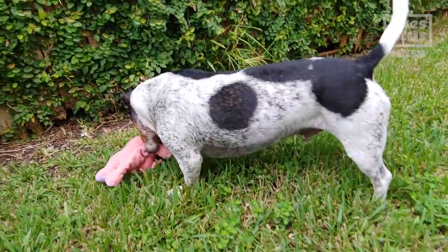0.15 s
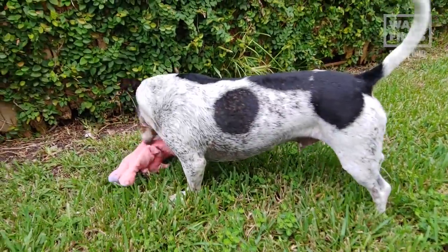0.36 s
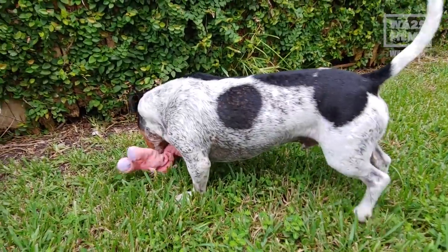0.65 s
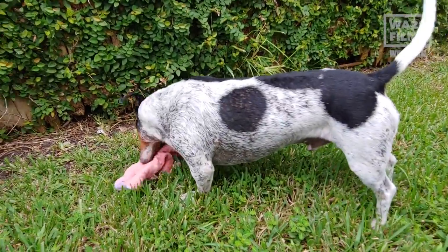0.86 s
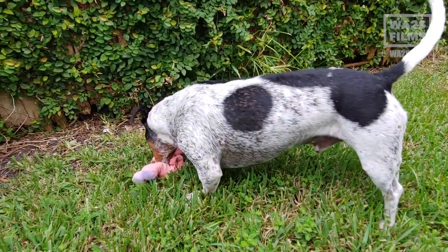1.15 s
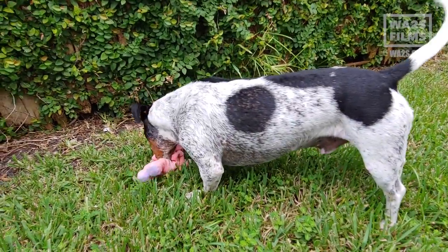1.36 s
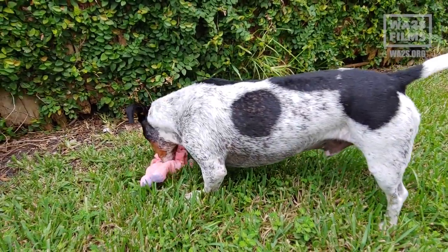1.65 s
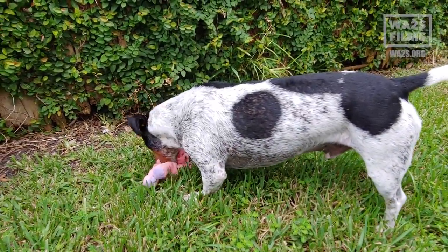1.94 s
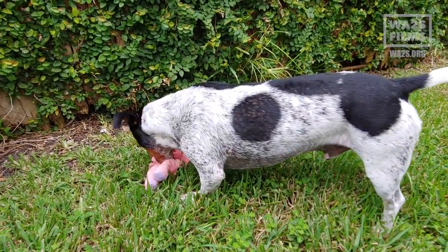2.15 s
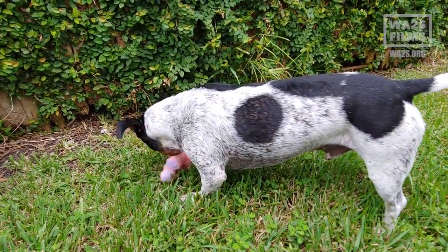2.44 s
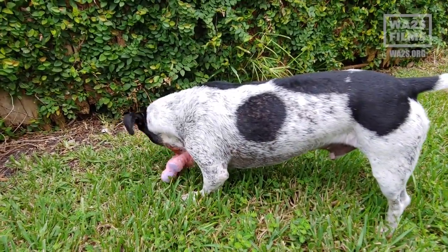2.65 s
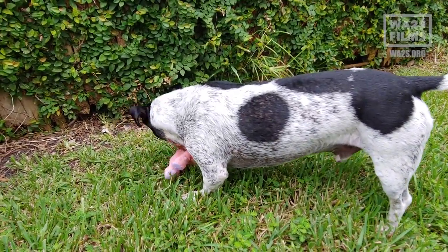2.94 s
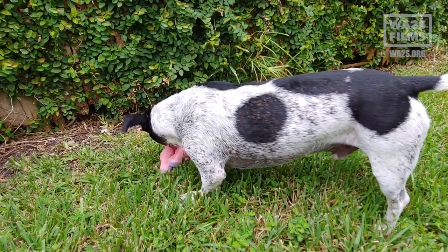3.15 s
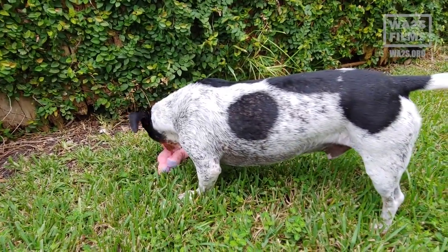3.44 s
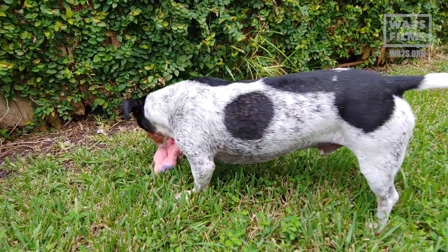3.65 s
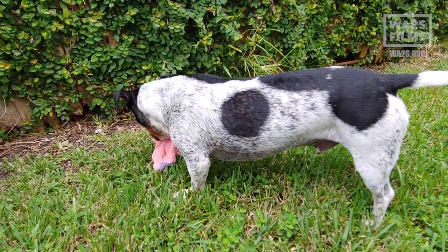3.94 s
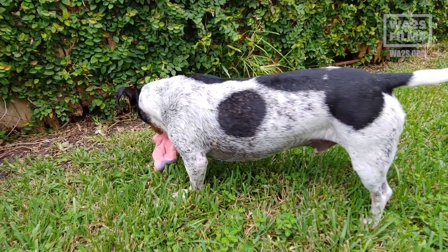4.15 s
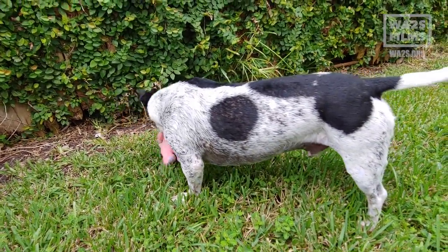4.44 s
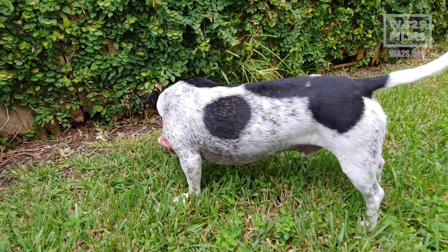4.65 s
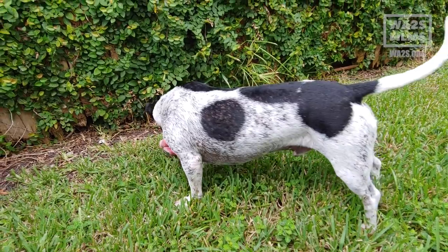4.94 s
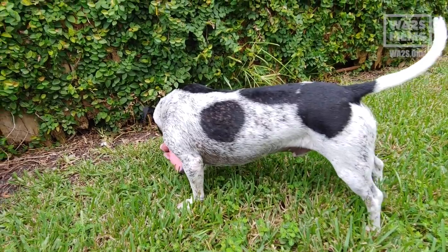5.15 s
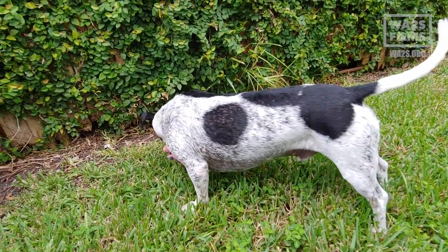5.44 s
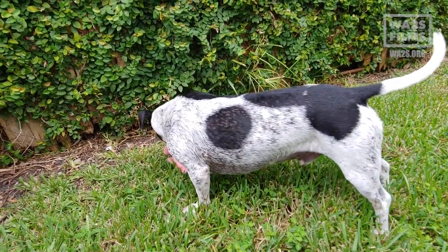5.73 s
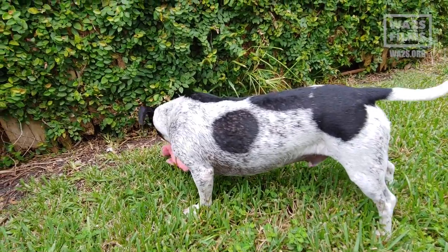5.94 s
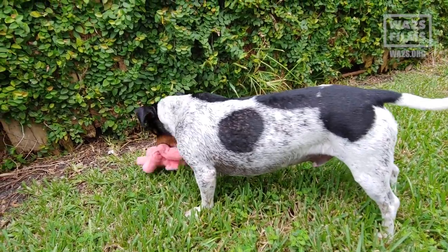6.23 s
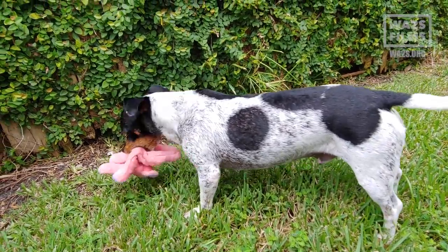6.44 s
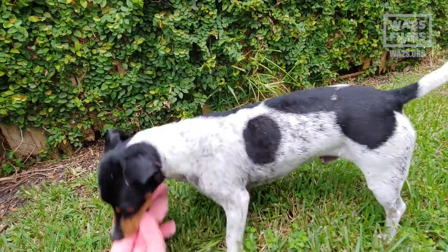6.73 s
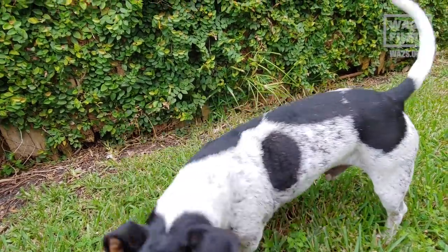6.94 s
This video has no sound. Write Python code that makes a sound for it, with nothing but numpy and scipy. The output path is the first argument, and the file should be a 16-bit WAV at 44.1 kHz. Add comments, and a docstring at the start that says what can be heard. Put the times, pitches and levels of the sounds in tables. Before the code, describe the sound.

Open yard with low steady hum, faint hiss and wind thumping independently on left and right microphone ports. Close in front, a dog works a soft toy: dry crackles and cloth rustle, quick creaking clicks, a single tiny downward squeak near one second, sparse ticks, then popping wet smacks in the second half. It ends with a brushing rustle and a short wet nasal puff. Only a faint short echo from leaves and ground.

```python
"""A dog chewing a squeaky toy

A dog chews a soft toy on a lawn, two metres from a pair of microphone ports. Short dull clicks creak before a
reed's one falling squeak, and go on as low ticks. Wet seals break in rising smacks, given body and edge by
short damped rings. Shaped noise makes the crackle and rustle of grass and cloth, the spit of the smacks and a
closing snort. Behind are the steady tones of a machine, the hiss of the yard and wind that buffets each port on
its own."""
import sys
import numpy as np
from scipy import signal
from scipy.fft import rfft, irfft, next_fast_len
from scipy.io import wavfile
from scipy.ndimage import uniform_filter1d, map_coordinates

SR = 44100
rng = np.random.default_rng(int(sys.argv[2]) if len(sys.argv) > 2 else 0)


def to_wav(s):
    """Save 16-bit WAV."""
    ch = np.atleast_2d(s).T  # columns
    pcm = np.round(np.clip(ch, -1, 1) * 32767)  # PCM
    wavfile.write(sys.argv[1], SR, pcm.astype(np.int16))


N = 313110
TIME_S = np.arange(N) / SR
FRAMES_S = np.arange(0, N / SR + .01, .002)  # coarse clock for slow changes


def gain_of(db):
    """Turns decibels into a gain."""
    return 10 ** (np.asarray(db) / 20)


def evened(x):
    """Scales a signal to rms 1."""
    return x / np.sqrt(np.mean(x ** 2) + 1e-20)


def bandpass(x, low_hz, high_hz, order=2):
    """Keeps the sound between two pitches."""
    return signal.lfilter(*signal.butter(order, [low_hz, high_hz], "band", fs=SR), x)


def read(points, hz):
    """Reads a curve of (pitch, value) points on a log pitch axis."""
    point_hz, value = np.transpose(points)
    return np.interp(np.log(hz + 1), np.log(point_hz + 1), value)


def curve(rows):
    """Draws every column of a timed table sample by sample."""
    start_s, *columns = np.transpose(rows)
    return [np.interp(TIME_S, start_s, column) for column in columns]


def colour(x, points):
    """Filters a sound through a spectrum given in dB."""
    size = next_fast_len(x.shape[-1])
    gain = gain_of(read(points, np.fft.rfftfreq(size, 1 / SR)))
    return irfft(rfft(x, size) * gain, size)[..., :x.shape[-1]]


def drift(per_s):
    """Wanders smoothly between random values, at most 60 a second, with rms 1."""
    knots = rng.standard_normal(480)
    slow = map_coordinates(knots, [FRAMES_S * min(per_s, 60)], order=3)
    return evened(np.interp(TIME_S, FRAMES_S, slow))


def pan_gains(pan_db):
    """Gains of the left and right port for a left-right difference in dB."""
    return gain_of([[pan_db / 2], [-pan_db / 2]])


def ports(x, pan_db, left_lag_ms):
    """Sends one sound to both ports, with a difference in level and arrival time."""
    size = next_fast_len(len(x))
    khz = np.fft.rfftfreq(size, 1e3 / SR)
    delay = np.exp(-1j * np.pi * khz * left_lag_ms)  # half the lag on each side
    pair = irfft(rfft(x, size) * np.array([delay, 1 / delay]), size)[:, :len(x)]
    return pair * pan_gains(pan_db)


def add(mix, start_s, sound):
    """Mixes a sound in at its start time."""
    part = mix[:, round(start_s * SR):][:, :sound.shape[1]]
    part += sound[:, :part.shape[1]]


def swell(middle_s, length_s):
    """A bell-shaped rise and fall; its spread is the length over 2.5."""
    spread_s = max(length_s, .01) / 2.5
    return np.exp(-.5 * ((FRAMES_S - middle_s) / spread_s) ** 2)


def level_of(power):
    """Turns frame powers into decibels, sample by sample."""
    return np.array([np.interp(TIME_S, FRAMES_S, 10 * np.log10(p + 1e-12)) for p in power])


# Colour of the yard's hiss: pitch_hz, level_db (per Hz)
YARD_COLOUR = [(18, -40), (30, -3.5), (121, -6), (295, -17), (404, -18.5), (632, -25), (1160, -24),
               (1960, -27.5), (3500, -32.5), (6210, -41), (7090, -37.5), (8980, -43.5), (11700, -45.5),
               (16000, -58)]
# How alike the hiss is at the two ports: pitch_hz, likeness (0 to 1)
YARD_LIKENESS = [(60, 0.99), (200, 0.82), (450, 0.94), (900, 1), (2500, 0.15), (6000, 0.075), (15000, 0.11)]
# Balance of the hiss: pitch_hz, left_right_db
YARD_BALANCE = [(60, 1), (130, -1.5), (290, 2.5), (640, 4.5), (1410, 1), (3100, -7.5), (6820, -2.5),
                (15000, -10)]


def yard():
    """Smooth far hiss, shared by the ports mostly below 1 kHz; the shared part reaches the right one late."""
    frames, hz = N // 256 + 5, np.fft.rfftfreq(1024, 1 / SR)
    a, b, c, d, patches = rng.standard_normal((frames, 513, 5)).T
    patches = uniform_filter1d(uniform_filter1d(patches, 14, 0), 12, 1)
    patches = evened(patches)  # slight uneven patches in pitch and time
    likeness = np.clip(read(YARD_LIKENESS, hz), -1, 1)[:, None]
    late = np.exp(-2j * np.pi * hz * 0.00032)[:, None]  # 0.32 ms
    pan = gain_of(read(YARD_BALANCE, hz) / 2)[:, None]
    left = a + 1j * b
    right = likeness * left * late + np.sqrt(1 - likeness ** 2) * (c + 1j * d)
    spectra = np.array([left * pan, right / pan])
    spectra *= gain_of(read(YARD_COLOUR, hz)[:, None] + 1.46 * patches)
    hiss = signal.istft(spectra, nperseg=1024, noverlap=768)[1][:, :N]
    return gain_of(-45) * evened(hiss)


# Tones of the machine: pitch_hz, level_db, left_right_db, left_lead_rad, waver_db, fading_db_per_s
HUM_TONES = [(120.4, -43.5, 1.5, 0.03, 1.26, 0.25), (177.8, -50.5, 0, 0.056, 0.7, 0.2),
             (240.4, -64.5, -4, 0.28, 1.5, 0.5), (349.6, -56.3, 4.5, 0.19, 1.5, .35),
             (360.7, -59.5, -1, 0.16, 0.8, 0.14), (424, -74.5, 5, 0.38, 3, 1.2),
             (480, -72, 0, 0.42, 4, -0.5), (696, -62, -1.5, 1.6, 1.5, -0.02)]


def hum():
    """Steady machine tones that waver a little in level and phase."""
    out = np.zeros((2, N))
    for hz, db, pan_db, lead, waver_db, fading_db in HUM_TONES:
        phase = 2 * np.pi * (hz * TIME_S + rng.random()) + 0.12 * drift(3.54)
        level = np.sqrt(2) * gain_of(db - fading_db * TIME_S + waver_db * drift(12))
        out += level * np.sin(phase + [[lead], [0]]) * pan_gains(pan_db)
    return out


# Steady wind at each port: time_s, left_db, right_db
STEADY_WIND = [(0.0, -47, -37), (0.4, -39, -37), (0.62, -31.5, -29.5), (0.85, -35, -43), (1.1, -53, -58),
               (1.4, -42, -44), (1.6, -32, -43), (1.9, -40, -44), (2.0, -45, -48), (2.15, -34, -33.5),
               (2.7, -62, -40), (3.1, -39, -42.5), (3.35, -57, -52), (4.5, -58, -57), (5.1, -49, -41.5),
               (5.25, -45, -40.5), (5.9, -48, -34), (6.15, -37.5, -36.5), (6.5, -44.5, -47),
               (7.1, -42, -36.5)]
# Gusts, most of them stronger at one port: peak_s, level_db, left_right_db, length_s
GUSTS = [(0.17, -40, 14, 0.076), (0.58, -35, -5, .07), (0.694, -38, 10, 0.065), (0.89, -36, -15.5, 0.12),
         (1.548, -29.5, 0, 0.072), (1.657, -27, 21.5, 0.027), (1.716, -24, 8.5, 0.062),
         (1.79, -35, 10, 0.045), (1.88, -37, 16.5, 0.086), (2.015, -33, 29.5, 0.065),
         (2.173, -34, -15, 0.073), (2.452, -32.5, -17, 0.017), (2.564, -33.5, 6, 0.053),
         (3.219, -36.5, 15, 0.045), (3.558, -43, 4, 0.041), (3.916, -40.5, 0, 0.063), (4.61, -39, 1, 0.046),
         (5.208, -37.5, -17, 0.061), (5.314, -33, -4, 0.053), (5.466, -42, -14, 0.045),
         (5.67, -41, -25, 0.023), (5.897, -37, -12, 0.074), (6.097, -34, -9, 0.082),
         (6.385, -41, -12, 0.082)]
# Colour of the low buffeting: pitch_hz, level_db (per Hz)
BUFFET_COLOUR = [(12, -22), (25, -7.5), (45, 6), (80, 3.5), (130, -10), (250, -35), (500, -41), (1000, -71)]


def wind():
    """Lumpy low noise, unrelated at the two ports; stronger wind adds proportionally more of a higher roar."""
    time_s, *steady_db = np.transpose(STEADY_WIND)
    power = gain_of([np.interp(FRAMES_S, time_s, db) for db in steady_db]) ** 2
    for peak_s, db, pan_db, length_s in GUSTS:
        power = power + (gain_of(db) * pan_gains(pan_db) * swell(peak_s, length_s)) ** 2
    level_db = level_of(power) + 1.5 * np.array([drift(14), drift(14)])  # lumps
    noise = rng.standard_normal((2, 2, N))
    body = evened(colour(noise[0], BUFFET_COLOUR))
    local_level = np.sqrt(abs(uniform_filter1d(body ** 2, 2600)))
    body = evened(body / (0.84 + local_level))  # evens out chance swings so no gust falls silent
    roar = evened(colour(noise[1], [(60, -31), (120, 11.0), (200, -2.0), (400, -29.0), (900, -70.0)]))
    roar_gain = gain_of(-18.5 + 0.5 * (level_db + 34.5))
    return gain_of(level_db) * (body + roar_gain * roar)


# Grass and cloth stirring all along: time_s, level_db, low_db (under 3.5 kHz, against level_db)
STEADY_STIR = [(0.0, -49.5, 4), (0.45, -48.5, 3.5), (0.9, -50, 2.5), (1.4, -50.5, 3.5), (1.9, -51, 2),
               (2.05, -53, 1), (2.7, -53, 4), (3.0, -57, 3), (3.55, -58, 3.5), (3.9, -60.5, 1),
               (4.4, -55, 3), (4.75, -56.5, 5.5), (5.2, -53.5, 3.5), (5.75, -68, 8), (5.87, -67, -2),
               (6.15, -66, -4), (6.5, -61, 1), (6.7, -49, -2.5), (7.0, -49.5, 2.5), (7.1, -48.5, 1.5)]
# Swells of rustle, longer brushes and short ones that trail a crackle:
# middle_s, level_db, left_right_db, length_s, low_db (under 3.5 kHz, against level_db)
RUSTLE_SWELLS = [(0.612, -42, 0.5, 0.13, -2), (0.792, -46.5, -3, 0.21, -0.5), (1.09, -41.5, -1.5, 0.22, -3),
                 (1.264, -49, 1, 0.034, -6), (1.642, -45, 2, 0.017, 4), (1.904, -50, 1.5, 0.16, 1),
                 (2.495, -47.5, 1, 0.1, -5), (2.782, -55, 0, 0.067, -8), (3.182, -53.5, 0, 0.16, 1),
                 (3.688, -48.5, -5, 0.1, -1), (3.818, -51.5, -9, 0.043, -9), (4.57, -48, -1, 0.19, 0.5),
                 (4.923, -50, -1, 0.12, 0.5), (5.364, -49.5, 2, 0.049, 4), (5.472, -45, -0.5, 0.13, 0),
                 (5.303, -50.5, 2, 0.079, 3), (5.624, -48.5, 0.5, 0.079, -0.5),
                 (5.717, -49.5, 1.5, 0.11, -1), (5.813, -50, 4, 0.042, -1), (6.006, -54, 5, 0.021, -8),
                 (6.27, -52.5, 0, 0.12, 0), (6.7, -56, -1, .06, -6), (6.856, -38, 0.5, 0.15, 0.5)]


def stirring():
    """Levels in dB of the rustle: left and right above 3.5 kHz, then left and right below it."""
    time_s, db, low_db = np.transpose(STEADY_STIR)
    levels_db = (db - .5, db + .5, db + low_db - .5, db + low_db + .5)
    power = gain_of([np.interp(FRAMES_S, time_s, v) for v in levels_db]) ** 2
    for middle_s, db, pan_db, length_s, low_db in RUSTLE_SWELLS:
        sides_db = db + np.array([pan_db / 2, -pan_db / 2])
        peaks = gain_of(np.r_[sides_db, sides_db + low_db])[:, None]
        power = power + (peaks * swell(middle_s, length_s)) ** 2
    return level_of(power)


# Colour of the scraping grass: pitch_hz, level_db (per Hz)
GRASS_COLOUR = [(290, -16), (500, -4.5), (906, -5), (1190, -9.5), (1980, -2), (3390, -3), (7100, -9),
                (8580, -4), (11800, -16), (16000, -23)]


def scrapes(per_s, smooth):
    """Noise broken up by sparse grains of uneven size; a larger smooth part hides the grains."""
    size = gain_of(6.8 * np.minimum(rng.exponential(1, N), 2.3)) * (rng.random(N) < per_s / SR)
    grains = smooth + evened(signal.lfilter([1], [1, -np.exp(-1 / 30)], size))  # decay of 30 samples
    air = ports(rng.standard_normal(N), 0, -0.12) + 1.41 * rng.standard_normal((2, N))
    return evened(colour(air * grains, GRASS_COLOUR))


def rustle(stir_db):
    """Cloth drags in the low band, blades scrape in the middle, dry tips tick on top."""
    low = signal.filtfilt(*signal.butter(2, 3500, fs=SR), scrapes(300, 3.4))
    middle = signal.filtfilt(*signal.butter(2, [3500, 8000], "band", fs=SR), scrapes(400, 2.2))
    top = signal.filtfilt(*signal.butter(2, 8000, "high", fs=SR), scrapes(400, 1.0))
    return gain_of(stir_db[2:]) * low + gain_of(stir_db[:2]) * (middle + top)


def crackle(db, hz, low_db, pan_db):
    """A sharp crackle, a stalk or thread snapping or spit at a smack: a bright band of its own over a wide,
    weaker spray."""
    t_ms = np.arange(600) / SR * 1e3
    shared, *own = rng.standard_normal((3, 600))
    decay = np.exp(-t_ms / 4.34) + 1.7 * np.exp(-t_ms / 0.35)
    snap = (shared + 0.86 * np.array(own)) * decay  # only partly alike at the ports
    wide = bandpass(snap, 3900, 11500, 3)
    high = 0.5 * wide + 1.32 * bandpass(snap, hz / 1.19, hz * 1.21, 1)
    low = bandpass(snap, 1200, 4200)
    sound = high / abs(high).max() + gain_of(low_db) * low / abs(low).max()
    return gain_of(db) * pan_gains(pan_db) * sound


def faint_crackles(stir_db, count=120):
    """Random crackle rows, kept more often as the rustle nears its busiest."""
    when, keep, pitch, size, low, side = rng.random((count, 6)).T
    busy = gain_of(stir_db[0, (when * (N - 1)).astype(int)] + 45.5)  # all kept from -45.5 dB up
    rows = [when * N / SR,
            -47 + 4.5 * (2 * size - 1),  # level, dB
            np.interp(pitch, [0, 1], (4000, 7200)),  # pitch, Hz
            -7 + 13.0 * (2 * low - 1),  # low band, dB
            -7 + 3.4 * (2 * side - 1)]  # left-right, dB
    return np.transpose(rows)[keep < busy]


# Clear crackles, those at the smacks being spit: start_s, level_db, brightest_pitch_hz, low_db (under about 4
# kHz, relative), left_right_db
CRACKLES = [(0.578, -33, 4280, -11, -1), (0.849, -32, 6960, -14, 13), (0.8707, -32, 4100, -16, 4),
            (0.915, -35, 5710, -17, 4), (0.96, -36, 5050, -7, -6), (1.08, -34, 7010, -3, 13),
            (1.409, -41, 6700, 7, -1), (1.498, -37, 4050, -16, -7), (1.6345, -30.5, 4830, -18, -1),
            (1.652, -39, 10500, -4, 0), (1.681, -39, 11500, -15, 0), (1.695, -33, 4760, -11, 2),
            (1.723, -31, 5950, -6, -2), (1.775, -37, 6060, -4, -3), (1.8083, -34, 6810, -12, -1),
            (1.829, -26, 6050, -4.5, 4), (1.84, -35, 7500, -12, 0), (1.86, -43, 4200, 8, 0),
            (1.911, -39, 4150, -1, 5), (1.937, -36, 4300, 3, 10), (2.043, -42, 4270, 1, -8),
            (2.089, -41, 6790, 0, -3), (2.239, -37, 6400, -13, 3), (2.262, -45, 4130, 4, 2.5),
            (2.341, -35, 4280, -9, 11), (2.432, -37, 3970, -4, 9), (2.494, -42, 7210, 8, 4),
            (2.56, -40, 4020, 0, -8), (2.678, -45, 4200, 8, 1), (2.7798, -39.5, 4930, -2, 9),
            (2.9412, -41, 5010, 6.5, 2), (3.22, -38.5, 7050, -17, -15), (3.371, -37.5, 4060, -3, 2),
            (3.613, -38.5, 6240, -19, -5), (3.6356, -33, 6550, -10, 9), (3.663, -35, 5530, -4, 16),
            (3.679, -35, 7010, -11, 0.0), (3.698, -31.5, 6300, -4.5, 16), (3.728, -34, 6900, -2, -3),
            (3.8138, -34, 5400, -7.5, 15.5), (3.827, -38, 6920, -10, 0), (4.135, -37, 7080, -9, 4),
            (4.17, -44, 11000, -15, 0), (4.194, -44, 11500, -15, 0), (4.2202, -35, 9700, -20, 4),
            (4.2916, -36, 5070, -7, 7), (4.341, -37, 5800, -6, 4), (4.438, -40, 7000, -3, 0),
            (4.446, -35.5, 4750, -1, 5), (4.532, -32.5, 6760, -2, 0), (4.545, -39, 6500, 2, 0),
            (4.574, -30, 7200, -8, 1), (4.608, -37, 6900, -14, 0), (4.6487, -30.5, 6990, -11, 8),
            (4.8294, -35.5, 5530, -28, -4), (5.102, -36.5, 7250, -10, 7), (5.1625, -41, 4160, 2, 6),
            (5.235, -34, 10000, -3, 6), (5.3603, -27.5, 4970, -3, -10), (5.4156, -37, 6010, -1.5, 15),
            (5.6008, -34, 4870, -8, -1), (5.6858, -26.5, 6700, -14, -12), (5.751, -39.5, 6820, 3, 3),
            (5.815, -31.5, 5200, -3, -3), (6.0026, -33, 7460, -10, -7), (6.189, -34.5, 9150, -3.5, 3),
            (6.2333, -40, 6550, -3, 15), (6.251, -33, 4670, -1, 1), (6.2667, -37, 4890, -13, 9),
            (6.276, -38, 5590, -15, 8), (6.3897, -30.5, 4400, 3, -2), (6.416, -40, 7000, -17, 2),
            (6.439, -40, 5150, -16, -2), (6.704, -36, 7020, -1, -0.5), (6.8894, -38, 4200, 0, -2),
            (6.9094, -41, 4500, -5, 1.5)]


def add_crackles(mix, stir_db):
    """Crackles at set times, and faint ones that fall by chance, thickest where the rustle is loudest."""
    for start_s, *settings in [*CRACKLES, *faint_crackles(stir_db)]:
        add(mix, start_s, crackle(*settings))


# Snort: time_s, level_db
SNORT_LEVEL = [(6.68, -55), (6.726, -51), (6.738, -57), (6.784, -36.5), (6.81, -31.5), (6.848, -34.5),
               (6.875, -40), (6.912, -45), (7.02, -53)]
# Colour of the air in the nose: pitch_hz, level_db (per Hz)
NOSE_COLOUR = [(180, -34), (350, -6), (455, -23), (946, -1), (1150, -6), (1510, -1.5), (1950, -7.5),
               (2400, -0.5), (3200, -13), (4100, -8), (5900, -8.5), (6800, -15), (8360, -8.5),
               (11500, -17.5), (16000, -21)]


def snort():
    """A puff of air through the nose, fluttering and wet."""
    db, = curve(SNORT_LEVEL)
    air = ports(rng.standard_normal(N), 4.6, -0.16) + 0.97 * rng.standard_normal((2, N))
    sounding = (TIME_S > SNORT_LEVEL[0][0]) * (TIME_S < SNORT_LEVEL[-1][0])
    puff = gain_of(db + 0.61 * drift(55)) * sounding
    drops = rng.exponential(1, N) * (rng.random(N) < 350 / SR)  # about 350 a second
    spit = 1 + 0.2 * evened(signal.lfilter([1], [1, -np.exp(-1 / 40)], drops))
    return puff * evened(colour(air * spit, NOSE_COLOUR))


def short_ring(db, hz, ring_ms, pan_db):
    """A quickly damped tone, low or high, with little below its pitch."""
    t = np.arange(600) / SR
    tone = -np.sin(2 * np.pi * hz * t) * np.exp(-t * 1e3 / ring_ms)
    thin = signal.lfilter(*signal.butter(2, hz / 2, "high", fs=SR), tone)
    return gain_of(db) * ports(thin, pan_db, 0.1)


# Short damped rings, nearly all at the smacks: start_s, level_db, pitch_hz, ring_ms, left_right_db
SHORT_RINGS = [(4.3343, -40, 1150, 1.5, -2), (4.3345, -35, 3400, .45, -3), (4.3374, -39, 1150, 1.5, -2),
               (4.338, -35, 3400, .45, -3), (4.4746, -32, 1200, 1.5, 2), (4.475, -30, 3000, .6, -9),
               (4.62, -32, 3150, .55, -8), (4.6202, -29, 1150, 1.3, 0), (4.8288, -35, 616, 1.5, -2),
               (4.8293, -29, 5800, .7, -6), (4.8295, -31, 1350, .8, -2), (4.8297, -31, 3800, .6, 0),
               (5.236, -43, 1050, 1.5, -2), (5.3604, -28, 3700, .45, -12), (5.3606, -30, 1750, .7, -6),
               (5.3612, -35, 600, 1.5, -2), (5.6858, -27, 2200, .8, -10), (5.6865, -27, 3550, .8, -12),
               (6.0028, -31, 2200, 1.2, -8), (6.0036, -30, 3600, .8, -10), (6.3902, -28, 4700, .5, -12),
               (6.3903, -23, 2200, .8, -10), (6.3907, -24, 3700, .5, -2)]


def add_short_rings(mix):
    """Places the rings that sound together with the smacks and give them body and edge."""
    for start_s, *settings in SHORT_RINGS:
        add(mix, start_s, short_ring(*settings))


def smack(db, hz, pan_db, rise, ring_ms, lag_ms, first_ms, first_db, first_pan_db, echo_db, echo_ms, lead_ms):
    """A wet seal breaks in two slips; the pocket of air rings briefly, rising as it opens."""
    def ring(t_ms, length_ms):
        """The ringing pocket: a gliding tone, a short upper mode and an abrupt end."""
        u = np.maximum(t_ms, 0) / length_ms
        glide_hz = hz * 2 ** (rise * (1 - np.exp(-1.5 * u)))
        turns = np.cumsum(glide_hz * (t_ms > 0)) / SR
        upper = .15 * np.exp(-2 * u) * np.sin(2 * np.pi * 1.8 * turns)
        pocket = np.sin(2 * np.pi * turns) + upper
        return pocket * (1 - np.exp(-5 * u)) * np.exp(-u ** 1.7)

    t_ms = np.arange(700) / SR * 1e3 - lead_ms
    first_slip = gain_of(first_db) * ports(ring(t_ms + first_ms, .6), first_pan_db, lag_ms)
    main_slip = ports(ring(t_ms, ring_ms), pan_db, lag_ms)
    echo = gain_of(echo_db) * ring(t_ms + lag_ms / 2 - echo_ms, ring_ms)
    sound = first_slip + main_slip + np.outer([0, 1], echo)  # echo at the right port only
    # too small a pocket to push bass
    return gain_of(db) * signal.lfilter(*signal.butter(2, hz / 1.4, "high", fs=SR), sound)


# Smacks: main_slip_s, level_db, starting_pitch_hz, left_right_db, rise_octaves, ring_ms, left_lag_ms,
# first_slip_earlier_ms, first_slip_db (relative), first_slip_left_right_db,
# right_echo_db (relative), right_echo_delay_ms
SMACKS = [(4.3377, -27.5, 1530, -2, 0.67, 0.73, 0.14, 3.5, 1, -1.5, -20, 2.8),
          (4.4744, -22.5, 1460, -0.5, 0.62, 2.15, 0.06, 0.64, -5, -2.5, -14, 2.2),
          (4.6196, -18, 1600, 0, 0.45, 1.05, 0.12, 1.1, -24, 2, -18, 2.8),
          (4.8301, -30.5, 2200, -5.5, 0.46, 2.1, 0.5, 0.94, 0, 3.5, -12, 2.9),
          (5.0746, -36, 2020, 0, 0.87, 2.1, 0.4, 1.34, -1, -3, -16, 3.2),
          (5.3613, -25.5, 2350, 6, 0.5, 1.5, 0.1, 0.97, -1.5, -6.5, -13, 3.2),
          (5.6863, -18.5, 2100, -1, 0.84, 1.6, 0.46, 0.81, -6.5, -3, -10, 2.2),
          (6.0035, -21.5, 2300, 1, 0.62, 1.45, 0.45, 1.05, -11, -9, -8, 2.1),
          (6.3904, -12, 2280, -0.5, 0.57, 1.6, 0.1, 1.05, -17, -7.5, -12, 2.25)]


def add_smacks(mix):
    """Places every smack, leaving room for the slip that comes before the main one."""
    lead_ms = 4.5
    for main_slip_s, *settings in SMACKS:
        add(mix, main_slip_s - lead_ms / 1e3, smack(*settings, lead_ms))


def dull_click(db, pan_db):
    """A spike and a very short noisy rattle, kept to the middle pitches."""
    t_ms = np.arange(600) / SR * 1e3
    rattle = 4.0 * (t_ms == 0) + rng.standard_normal(600) * np.exp(-t_ms / 1.1)
    click = bandpass(rattle, 1100, 3600)
    return gain_of(db) * ports(np.pad(click / abs(click).max(), 8), pan_db, -0.08)


# Short dull clicks, a run of creaks before the squeak, then low ticks, some under crackles:
# start_s, level_db, left_right_db
DULL_CLICKS = [(1.011, -44, 3), (1.0306, -30, 5), (1.053, -32, 0), (1.0624, -40, 0.5), (1.0782, -31, 0.0),
               (1.084, -36, 0), (1.0993, -33, -0.5), (1.1176, -28, 0.5), (1.1255, -33, 0), (1.131, -35, 0),
               (1.1365, -29, 4), (1.1432, -33, 12), (1.2506, -35.5, 12), (1.2635, -42, -1.5),
               (1.766, -37, 11), (1.83, -37, 2), (1.838, -41, 0), (1.861, -37, 0), (1.888, -39, 0),
               (1.912, -37, 0), (1.937, -30, 3), (1.97, -36, -2), (2.055, -36, -6), (2.0873, -41, -1.5),
               (2.253, -35, 4), (2.494, -42, 3), (2.526, -38, -8), (2.6095, -42, -2.0), (2.6678, -40, -2.0),
               (2.7256, -39, -1), (2.763, -43, -2.5), (2.9406, -41, -5)]


def add_dull_clicks(mix):
    """Places the creaks and the low ticks."""
    for start_s, *settings in DULL_CLICKS:
        add(mix, start_s, dull_click(*settings))


# The squeak: time_s, level_db, pitch_hz, step_db (added from each tone to the next one up)
SQUEAK = [(1.1545, -44, 1900, -12), (1.1575, -33, 1130, -1), (1.1605, -31, 1085, 0), (1.173, -32, 1066, -1),
          (1.182, -29.5, 1030, -1), (1.192, -30.5, 1008, -2.5), (1.198, -31.5, 962, -3.5),
          (1.21, -35.5, 940, -6), (1.215, -48, 943, -10), (1.232, -55, 945, -15)]
# Starting levels of reed tones 1 to 7: level_db
REED_TONES = [0.5, 1.5, -6, -6, -10, -22, -28]


def squeak():
    """A reed slows as the air runs out; its upper tones are unsteady and fade first; air rushes past it."""
    db, hz, step_db = curve(SQUEAK)
    jitter = evened(uniform_filter1d(rng.standard_normal(N), 70))
    turns = np.cumsum(hz * (1 + 0.014 * jitter)) / SR
    tone = np.zeros(N)
    for k, tone_db in enumerate(REED_TONES):
        flicker = drift(60) + .9 * evened(uniform_filter1d(rng.standard_normal(N), 130))
        level = gain_of(tone_db + k * step_db + np.sqrt(k) * flicker)
        tone -= level * np.cos(2 * np.pi * (k + 1) * turns)
    leak = evened(bandpass(rng.standard_normal(N), 1300, 6000))
    sounding = (TIME_S > SQUEAK[0][0]) * (TIME_S < SQUEAK[-1][0])
    reed = (tone + gain_of(-16) * leak) * gain_of(db) * sounding
    # a brief rush of air around the start of the reed, with a spread of 4 ms
    rush = evened(bandpass(rng.standard_normal(N), 1500, 2400))
    chiff = gain_of(-35) * np.exp(-.5 * ((TIME_S - SQUEAK[1][0]) / 0.004) ** 2) * rush
    return ports(reed + chiff, 4.9, -0.088)


def hedge(x):
    """Leaves and ground scatter a short dull echo, different at each port."""
    level_db, decay_s, delay_s = -19.5, 0.11, 0.0016  # the decay is the time to fall by 60 dB
    t = np.arange(6000) / SR
    taps = rng.standard_normal((2, 6000)) * gain_of(-60 * t / decay_s) * (t > delay_s)
    taps = signal.lfilter(*signal.butter(1, 4500, fs=SR), taps)
    return gain_of(level_db) * signal.oaconvolve(x, taps / np.linalg.norm(taps[0]), axes=1)[:, :N]


def scene():
    """The dog's sounds, most of them with echoes, over the yard, the machine and the wind."""
    background = yard() + hum() + wind()
    stir_db = stirring()
    dog = squeak()
    add_crackles(dog, stir_db)
    add_short_rings(dog)
    add_smacks(dog)
    add_dull_clicks(dog)
    return background + rustle(stir_db) + snort() + dog + hedge(dog)


def housing(x, modes):
    """Lifts or dips the sound at each resonance of a port."""
    for hz, width_hz, db in modes:
        x = x + (gain_of(db) - 1) * signal.lfilter(*signal.iirpeak(hz, hz / width_hz, fs=SR), x)
    return x


# Resonances of the housing at the left port: pitch_hz, width_hz, level_db
LEFT_PORT = [(1890, 520, -7.5), (2940, 260, 2), (5040, 4450, 5), (7980, 3600, -20), (11620, 370, 8.5),
             (14900, 4000, -31)]
# Resonances of the housing at the right port: pitch_hz, width_hz, level_db
RIGHT_PORT = [(1930, 500, 3.5), (7030, 570, 10), (9240, 2850, -13.5), (12500, 510, -5), (14500, 9200, -6)]


def record(dry):
    """Gives each port its own colour, then cuts the treble above 15.9 kHz."""
    heard = np.array([housing(dry[0], LEFT_PORT), housing(dry[1], RIGHT_PORT)])
    treble_cut = signal.firwin(511, 15900, window=("kaiser", 9), fs=SR)
    return signal.oaconvolve(heard, treble_cut[None], "same")


dry = scene()
out = record(dry)
to_wav(out)
```